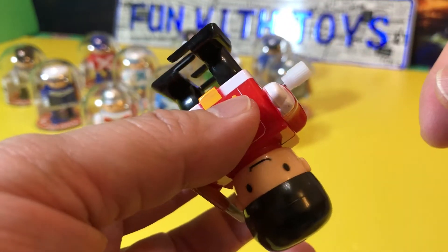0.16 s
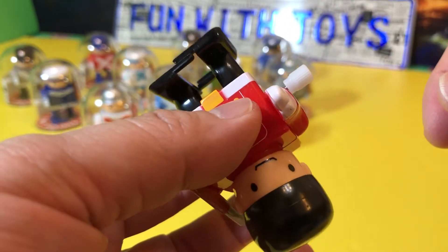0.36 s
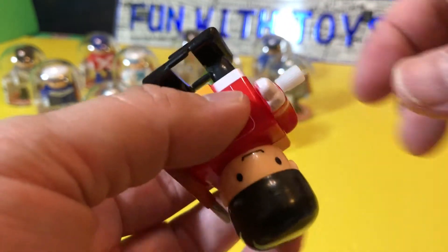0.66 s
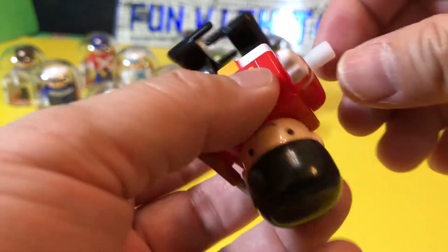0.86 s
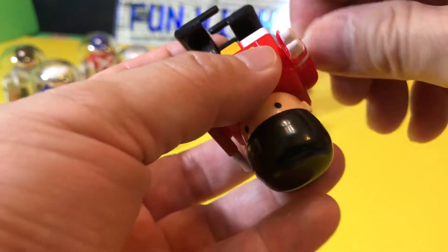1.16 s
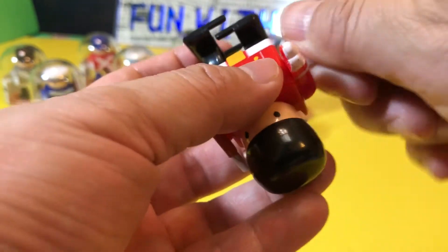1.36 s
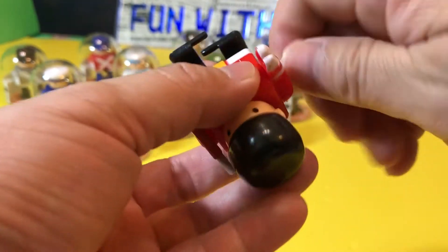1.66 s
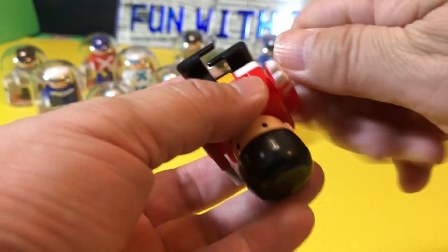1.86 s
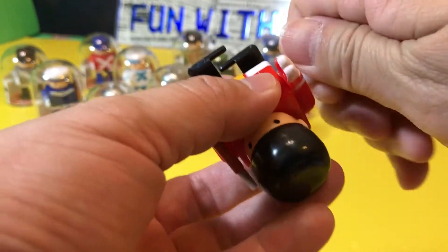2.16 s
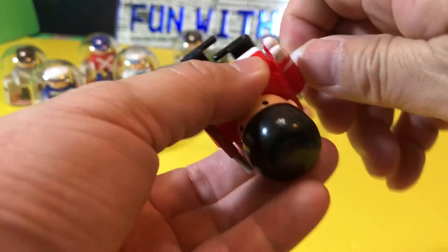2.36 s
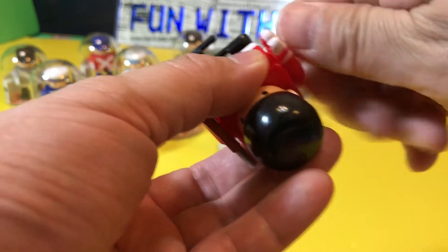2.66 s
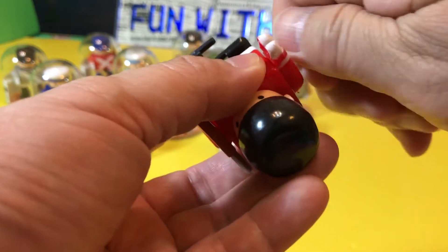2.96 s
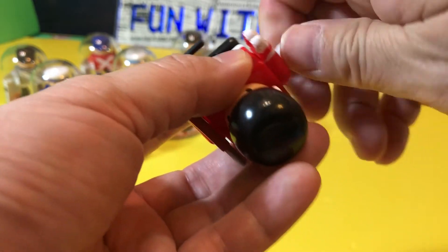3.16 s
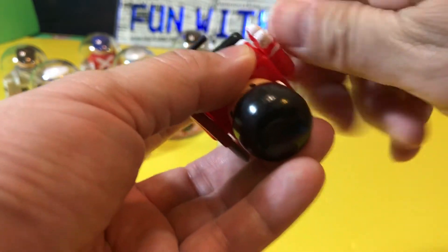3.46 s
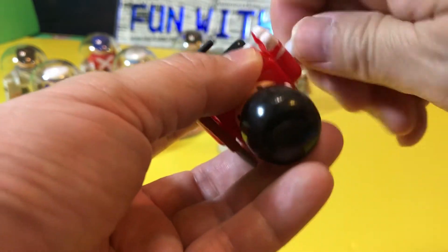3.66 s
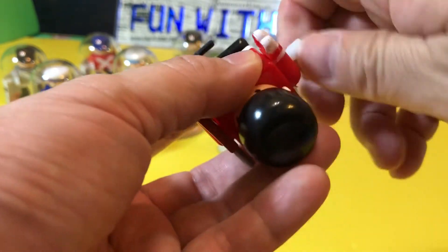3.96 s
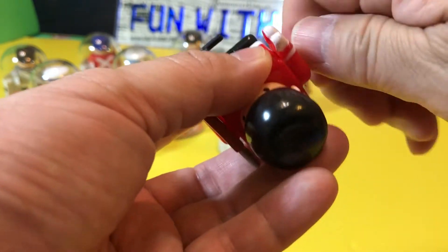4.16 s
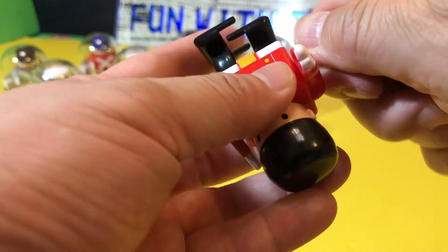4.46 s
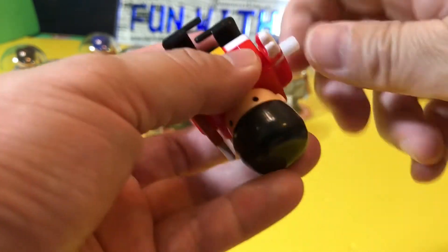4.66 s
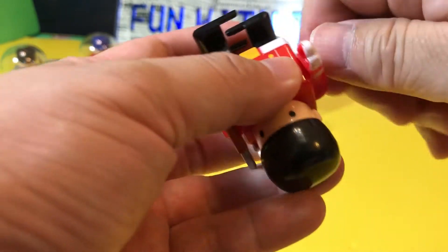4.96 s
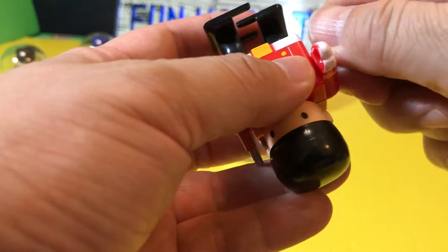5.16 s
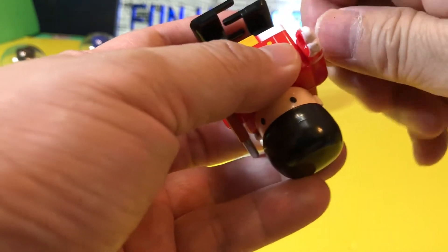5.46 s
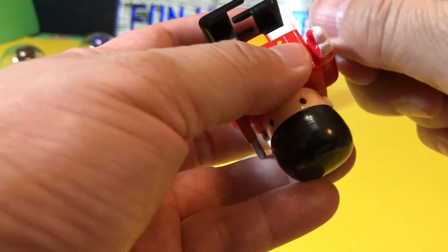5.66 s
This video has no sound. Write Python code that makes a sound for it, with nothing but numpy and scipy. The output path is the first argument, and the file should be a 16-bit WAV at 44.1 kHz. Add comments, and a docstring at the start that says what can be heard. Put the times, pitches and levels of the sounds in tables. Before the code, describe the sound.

Two brief buzzing whirs of tiny plastic gears come first, the second more uneven and growly. Then fingers wind the toy's knob: ten dry zipping ratchet bursts, quick at first, slower and more separate toward the end, with small clacks, short gear zips and faint finger rubs between. Close, detailed pickup, short room tail and low background hum.

```python
"""A quiet room: a small plastic clockwork toy is held close to the microphone.
Its motor whirs in two short runs: escapement beats and gear hiss through gliding resonances.
Then the knob is wound in ten twists: each ratchet click is a noise burst through the shell's modes.
Around the twists the gears slip briefly, the knob knocks with play and fingers rub the plastic.
Room noise, hum, fan tones and a faint thin tone lie beneath; the walls add a short tail."""
import sys
import numpy as np
from scipy import signal
from scipy.fft import rfft, irfft
from scipy.io import wavfile
from scipy.ndimage import uniform_filter1d

SR = 44100
rng = np.random.default_rng(int(sys.argv[2]) if len(sys.argv) > 2 else 0)


def wav_out(sig):
    """Save sig, one row per channel (or a flat mono array), as 16-bit PCM at SR to the path in sys.argv[1]."""
    wavfile.write(sys.argv[1], SR, np.round(np.clip(np.atleast_2d(sig).T, -1, 1) * 32767).astype(np.int16))


N = 255780
CLICK_SIZE = 1024  # samples


def gain_of(db):
    """Amplitude factor of a level in dB."""
    return 10 ** (np.asarray(db) / 20)


def evened(x):
    """Scale to unit RMS."""
    return x / np.sqrt(np.mean(x ** 2) + 1e-20)


def read(points, hz):
    """Interpolate (frequency, value) points over log frequency."""
    f, value = np.transpose(points)
    return np.interp(np.log(hz + 1), np.log(f + 1), value)


def add(mix, start_s, sound):
    """Add a sound into the mix in place."""
    part = mix[max(round(start_s * SR), 0):][:len(sound)]
    part += sound[:len(part)]


def bins(size):
    """Frequencies of the FFT bins, Hz."""
    return np.fft.rfftfreq(size, 1 / SR)


def causal(db):
    """The minimum-phase response that has this gain in dB."""
    log_gain = db * np.log(10) / 20
    circle = np.concatenate([log_gain, log_gain[-2:0:-1]])
    return np.exp(np.conj(signal.hilbert(circle)))[:len(db)]


def coloured(x, points):
    """Zero-phase filter to a spectrum given in dB."""
    return irfft(rfft(x) * gain_of(read(points, bins(len(x)))), len(x))


def ringing_db(rings, hz):
    """Summed lift of resonances, each a bell falling to half its dB at half its width off centre."""
    return sum(db / (1 + (2 * (hz - f) / width) ** 2) for f, width, db in rings)


def colour_db(x, size=25):
    """The broad bumps and dips in the spectrum of a blow."""
    power = uniform_filter1d(abs(rfft(x, 2 * CLICK_SIZE)) ** 2, size)
    return 10 * np.log10(power / power.mean())


def wobble(length, hz):
    """Slow random curve of unit RMS, with hz random knots a second."""
    along = np.arange(length) * hz / SR
    knots = int(along[-1]) + 2
    return evened(np.interp(along, np.arange(knots), rng.standard_normal(knots)))


def tones(lines, waver):
    """Steady tones whose phase wanders slowly in a random walk."""
    t = np.arange(N) / SR
    knots = np.linspace(0, t[-1], num=40)
    out = np.zeros(N)
    for hz, db in lines:
        phase = 2 * np.pi * (hz * t + rng.random())
        phase += waver * np.interp(t, knots, np.cumsum(rng.standard_normal(len(knots))))
        out += np.sqrt(2) * gain_of(db) * np.sin(phase)
    return out


def background(air_db=-58.7):
    """Coloured room noise, a mains hum that swells and sinks, and a wavering fan."""
    # room noise spectrum: (frequency [Hz], relative density [dB])
    air_colour = [(22, -28), (36, -4), (288, -2), (404, -9.5), (698, -15), (953, -15.5), (2310, -21),
                  (2630, -23), (5580, -32.5), (9500, -35), (15000, -39)]
    # mains hum before its swell: (frequency [Hz], level [dB])
    hum = [(99.8, -72), (150.3, -70.5)]
    # swell of the hum: (time [s], relative level [dB])
    hum_swell = [(0, -17), (.5, 2.5), (.75, 7.5), (2.1, 1.5), (5.8, -5)]
    # fan tones: (frequency [Hz], level [dB])
    fan = [(305, -68.5), (488, -79), (931, -80)]
    swell = gain_of(np.interp(np.arange(N) / SR, *np.transpose(hum_swell)))
    air = gain_of(air_db) * evened(coloured(rng.standard_normal(N), air_colour))
    return air + swell * tones(hum, waver=0.17) + tones(fan, waver=1.825)


def escapement(beats_per_s, beat_t60_s=0.0062, attack_s=0.00014, weak_db=-3, scatter_db=0.8,
               jitter_s=.00006, mesh_db=-6, alike=0.29):
    """A rocking anchor hits the wheel with strong and weak pallet in turn, over the hiss of meshing gears."""
    size, t = len(beats_per_s), np.arange(CLICK_SIZE // 2) / SR
    at = np.flatnonzero(np.diff(np.floor(np.cumsum(beats_per_s) / SR), prepend=-1))
    pallets = rng.standard_normal((2, len(t)))
    share, out = np.clip(alike, 0, 1), np.zeros(size)
    decay = np.minimum(t / attack_s, 1) * gain_of(-60 * t / beat_t60_s)
    chances = rng.standard_normal((len(at), 2))
    for k, (i, (force, late)) in enumerate(zip(at, chances)):
        blow = np.sqrt(share) * pallets[k % 2] + np.sqrt(1 - share) * rng.standard_normal(len(t))
        level_db = weak_db * (k % 2) + scatter_db * force
        add(out, i / SR + jitter_s * late, blow * decay * gain_of(level_db))
    hiss = evened(beats_per_s) * rng.standard_normal(size)  # louder when the gears run faster
    return evened(out) + gain_of(mesh_db) * hiss


def gearbox(x, rings, depth=1):
    """The motor's rattle passes through the ringing parts of the toy."""
    # gear train spectrum, floored at -60 dB: (frequency [Hz], relative gain [dB])
    gears = [(530, -48), (900, -24), (2080, -14.5), (2470, -7.5), (2860, -11.5), (3390, -8), (3740, -9),
             (7300, -6), (11200, -4), (13300, -5.5), (15200, -2), (15900, -13.5), (16500, -51.5)]
    hz = bins(2 * CLICK_SIZE)
    response = irfft(causal(np.maximum(read(gears, hz), -60) + depth * ringing_db(rings, hz)))
    return evened(signal.fftconvolve(x, response)[:len(x)])


def shifting_gearbox(x, rings, count=11, drift=0.0052, flutter_db=1.5):
    """As the legs swing and the hand shifts its hold, the resonances glide, wander and swell or fade."""
    along, out = np.linspace(0, 1, len(x)), np.zeros(len(x))
    for stage in np.linspace(0, 1, count):
        now = []
        for ring, (shift, favour) in zip(rings, rng.standard_normal((len(rings), 2))):
            hz, glide_hz, width_hz, db, swell_db = ring
            now_hz = (hz + glide_hz * stage) * (1 + drift * shift)
            now.append((now_hz, width_hz, db + swell_db * stage + flutter_db * favour))
        crossfade = np.maximum(1 - abs(along - stage) * (count - 1), 0)
        out += gearbox(x, now) * crossfade
    return evened(out)


def free_runs(growl_db=-3, growl_hz=3400, rough_hz=180, rough_db=1.5):
    """The spring drives the legs in the air; the gears run unevenly, with a rough growl below growl_hz."""
    # two runs of the motor, growl before growl_db:
    # (time [s], level [dB], relative growl [dB], escapement rate [beats/s])
    runs = [
        [(0, -27, -22, 596), (.125, -34.5, -24.5, 467), (.2, -32, -25, 440), (.234, -27.5, -23.5, 600),
         (.402, -29.5, -20, 500), (.43, -39.5, -18, 430), (.47, -43.5, -19, 490), (.49, -68, -18, 500)],
        [(.748, -43.5, -26, 200), (.783, -33.5, -20.5, 390), (.852, -37.5, -29, 280), (.925, -30, -17, 470),
         (1.04, -33, -13.5, 580), (1.081, -30, -17.5, 560), (1.1, -52, -34, 640)],
    ]
    # gear train resonances of each run, before drift and flutter:
    # (frequency [Hz], glide over the run [Hz], width [Hz], lift [dB], swell over the run [dB])
    gear_rings = [
        [(1350, 0, 300, 2, 12), (3370, 0, 300, 7, -8), (4340, 150, 390, 4.5, 2), (6300, -2, 660, 5.5, 0),
         (7470, -100, 360, 11.5, -5.5), (8920, 1200, 510, 7.5, -2.5), (11500, -250, 600, 5.5, -1),
         (13000, -1, 700, -10, 7.5), (14850, 251.5, 770, 3, 4)],
        [(2450, -3, 540, 1.5, 5), (3190, 2, 320, 4, 2.5), (5600, 298, 480, 8.5, -11), (7100, 250, 550, 6, -0.5),
         (9220, 200, 480, 7, -5), (11100, 96, 400, 3, 5), (15100, 350, 600, 4.5, -4.5)],
    ]
    lowpass = signal.butter(4, growl_hz, fs=SR, output="sos")
    out = np.zeros(N)
    for rows, rings in zip(runs, gear_rings):
        s, level_db, growls_db, beats_per_s = np.transpose(rows)
        t = np.arange(s[0], s[-1], 1 / SR)
        whir = shifting_gearbox(escapement(np.interp(t, s, beats_per_s)), rings)
        low = signal.sosfiltfilt(lowpass, whir)
        growl = evened(low * gain_of(rough_db * wobble(len(t), rough_hz)))
        whir = whir - low + growl * gain_of(np.interp(t, s, growls_db) + growl_db)
        add(out, s[0], whir * gain_of(np.interp(t, s, level_db)))
    return out


def room(x, wet_db=-23, delay_s=.012):
    """A faint diffuse tail, each band dying at its own speed, and scattered echoes from near walls."""
    # decay of the tail: (frequency [Hz], T60 [s])
    tail_t60 = [(500, 0.39), (2500, 0.357), (6000, 0.35), (11000, 0.3), (16000, 0.21)]
    # what the walls give back: (frequency [Hz], relative level [dB])
    walls = [(1000, 1.5), (5000, 0.5), (11000, -3), (15000, -5)]
    # near walls: (delay [s], level [dB])
    echoes = [(0.0154, -26.5), (.033, -32)]
    hz, t, z = signal.stft(rng.standard_normal(SR // 2), SR, nperseg=256)
    fading_db = read(walls, hz)[:, None] - 60 * t / read(tail_t60, hz)[:, None]
    tail = signal.istft(z * gain_of(fading_db), SR, nperseg=256)[1]
    response = np.zeros(SR // 2)
    add(response, delay_s, gain_of(wet_db) * tail / np.linalg.norm(tail))
    size = CLICK_SIZE // 8
    for echo_s, echo_db in echoes:
        echo = rng.standard_normal(size) * signal.windows.hann(size)
        add(response, echo_s, gain_of(echo_db) * echo / np.linalg.norm(echo))
    return signal.fftconvolve(x, response)[:N]


def whistle(start_s=0.42, length_s=0.47, hz=1938, db=-74):
    """A faint thin tone, faded in and out around the pause between the two runs."""
    out, size = np.zeros(N), int(length_s * SR)
    add(out, start_s, tones([(hz, db)], waver=0.88)[:size] * signal.windows.tukey(size, .5))
    return out


def slips(onset_db=-9, rise_share=0.19, braking=1.8, ring_hz=9150, ring_width_hz=900, ring_db=10.5,
          usual_beats_per_s=400, usual_db=-29, db_per_doubling=20):
    """As the grip on the knob loosens, the motor spins up for a moment and is braked again."""
    # slips around the twists: (start [s], length [s], level [dB], fall by the end [dB])
    slip_rows = [(1.187, 0.073, -33, -1), (1.514, 0.036, -52, 11), (2.317, 0.032, -29, 25),
                 (2.422, 0.023, -43.5, 8.5), (2.925, 0.025, -49, -6), (3.122, 0.068, -30.5, 26.5),
                 (3.297, 0.036, -47.5, -3.5), (3.501, 0.05, -27.5, 19), (3.623, 0.023, -39.5, 10),
                 (3.729, 0.024, -42, -2), (3.928, 0.088, -29.5, 17.5), (4.144, 0.064, -38, 0),
                 (4.42, 0.082, -46.5, 6), (4.627, 0.025, -37, 21)]
    # gear train resonances while the knob is held: (frequency [Hz], width [Hz], lift [dB])
    held_rings = [(1932, 320, -8), (4800, 400, 4.5), (6400, 480, 4.5), (11400, 1200, 3.5), (14600, 680, 2)]
    out = np.zeros(N)
    for start_s, length_s, db, fall_db in slip_rows:
        along = np.linspace(0, 1, int(length_s * SR))
        rise = np.interp(along, [0, rise_share], [1, 0])
        fall = np.interp(along, [rise_share, 1], [0, 1])
        level_db = db + onset_db * rise - fall_db * fall ** braking
        # a louder slip is a faster one
        beats_per_s = usual_beats_per_s * 2 ** ((db - usual_db) / db_per_doubling)
        rattle = escapement(np.full(len(along), beats_per_s), scatter_db=0.0, mesh_db=-4)
        slip = gearbox(rattle, held_rings + [(ring_hz, ring_width_hz, ring_db)])
        add(out, start_s, slip * gain_of(level_db))
    return out


def ratchet(clicks, alike, depth, softness=0.33, soft_hz=2850, hard_knock_db=-10, attack_s=0.0003,
            hold_s=0.00071, snap_t60_s=0.0088, top_speed=1.9, ring_t60_s=0.039, ring_db=-23,
            scrape_s=0.00022, scrape_db=-15, knock_lag_s=0.00018, lead_s=.0016, trim_db=-0.71,
            drift=0.02, spot_db=2.5, evenness=.35):
    """The pawl scrapes off a tooth, drops and shakes the hand-damped shell; clicks of one grip are alike."""
    # plastic shell under a click: (frequency [Hz], relative gain [dB])
    shell_colour = [(200, -37), (650, -30), (900, -27), (1350, -17.5), (1900, -18), (2400, -15.5),
                    (3100, -12), (4300, -12.5), (6300, -1), (8000, -3), (9300, 2), (13000, 1), (14700, 3),
                    (15500, 2.5), (16200, -7.5), (17000, -27)]
    # fixed dip in the shell's response, before depth: (frequency [Hz], width [Hz], lift [dB])
    dips = [(5700, 410, -4)]
    # each new grip presses the shell elsewhere; before drift, spot, hardness and depth:
    # (from [s], low, middle, high, upper, top mode [Hz], top, pawl, hollow lift [dB])
    grips = [(1.1, 4370, 6500, 9250, 11450, 14600, 7.5, 6.5, 1),
             (1.7, 4400, 6350, 8920, 11300, 15000, 4, 9, -1.5),
             (2.1, 4340, 6500, 9030, 11550, 15100, 3.5, 2.5, -1.5),
             (2.5, 4500, 6950, 9050, 11460, 14670, 7, 1.5, -3),
             (2.9, 4700, 6450, 9070, 11300, 14350, 9, 4.5, -4.5),
             (3.28, 4700, 6900, 8940, 11300, 14650, 13, 7, -2.5),
             (3.7, 4700, 6300, 9060, 11400, 14700, 8, 6.5, -1.5),
             (4.1, 5100, 6150, 9140, 11600, 14900, 7, 1.5, 0),
             (4.9, 4400, 6350, 10000, 11540, 15000, 2, 2, -6),
             (5.5, 4920, 7620, 10400, 11800, 15000, 3.5, 8, -4.5)]
    # low to upper modes, before spot, hardness and depth: (width [Hz], lift [dB])
    grip_modes = [(600, 4.5), (600, 3.5), (600, 7.5), (830, 5.5)]
    # knock | snap | sizzle crossovers: (lower [Hz], upper [Hz])
    band_edges = (4800, 12700)
    top_width_hz, pawl_hz, pawl_width_hz = 980, 2427, 310
    hollow_hz, hollow_width_hz = 1750, 990
    body_hz, body_width_hz, body_per_knock, usual_knock_db = 5900, 2800, .65, -14

    t, hz = np.arange(CLICK_SIZE) / SR - lead_s, bins(2 * CLICK_SIZE)
    # knock, snap and sizzle: the low motions are fed for a moment, the top dies at once
    free_s = np.maximum([t - 2 * hold_s, t - hold_s, t * top_speed], 0)
    attack = np.clip(t / attack_s + .5, 0, 1)
    decay = attack * np.hypot(gain_of(-60 * free_s / snap_t60_s),
                              gain_of(ring_db - 60 * free_s / ring_t60_s))
    decay += gain_of(scrape_db) * np.exp(-abs(t) / scrape_s)
    low, under_top = (1 / (1 + (hz / edge) ** 16) for edge in band_edges)
    lag = np.exp(-2j * np.pi * np.cumsum(low) * hz[1] * knock_lag_s)  # the knock comes a little later
    bands = lag * np.array([low, under_top - low, 1 - under_top])
    grip_noise = rng.standard_normal((len(grips), CLICK_SIZE))
    share, out = np.clip(alike, 0, 1), np.zeros(N)
    for s, db, knock_db, sizzle_db in clicks:
        k = np.searchsorted([row[0] for row in grips], s) - 1
        _, *grip_hz, top_db, pawl_db, hollow_db = grips[k]
        # each click lands on a slightly different spot: the modes shift and some speak more than others
        spot = rng.standard_normal((len(grip_hz), 2))
        hardness = np.clip(-knock_db / 10, 0, 1)  # a dull touch does not wake the modes
        shapes = [*grip_modes, (top_width_hz, top_db)]
        modes = []
        for f, (width_hz, lift_db), (shift, favour) in zip(grip_hz, shapes, spot):
            modes.append((f * (1 + drift * shift), width_hz, hardness * (lift_db + spot_db * favour)))
        # among hard clicks, a heavier knock fills the middle of the shell's range, a light one thins it
        body_db = hardness * body_per_knock * (knock_db - usual_knock_db)
        modes += [*dips, (pawl_hz, pawl_width_hz, pawl_db), (hollow_hz, hollow_width_hz, hollow_db),
                  (body_hz, body_width_hz, body_db)]
        # a blow that is mostly knock is a soft one: it loses level away from soft_hz
        octaves_off = np.minimum(abs(np.log2((hz + 1) / soft_hz)), 1)
        soft_db = softness * max(knock_db - hard_knock_db, 0) * octaves_off
        shell_db = read(shell_colour, hz) + depth * ringing_db(modes, hz) - soft_db
        fresh = rng.standard_normal(CLICK_SIZE)
        blow = (np.sqrt(share) * grip_noise[k] + np.sqrt(1 - share) * fresh) * decay
        # the knock varies less in colour from blow to blow than the snap does
        shell = causal(shell_db - np.clip(evenness, 0, 1) * low * colour_db(blow[0]))
        parts = irfft(rfft(blow, 2 * CLICK_SIZE) * shell * bands)
        parts /= np.sqrt((parts ** 2).sum(1, keepdims=True) / (.004 * SR))  # level refers to 4 ms
        levels_db = db + trim_db + np.array([knock_db, 0, sizzle_db])
        add(out, s - lead_s, (gain_of(levels_db) @ parts)[:CLICK_SIZE])
    return out


def fingers(catches_per_s=1100, slide_db=-3):
    """Skin catches and slides on the plastic: random impulses over steady noise."""
    # fingertip rubs: (start [s], length [s], level [dB])
    rubs = [(2.437, 0.077, -61), (4.664, 0.026, -51), (4.853, 0.067, -59.5), (5.323, 0.04, -54)]
    # rubbing spectrum: (frequency [Hz], relative gain [dB])
    skin = [(600, -22.5), (1500, 0), (2500, 6), (3500, -2), (6000, -7.5), (10000, -18), (16000, -33)]
    out = np.zeros(N)
    for start_s, length_s, db in rubs:
        size = int(length_s * SR)
        catches = rng.standard_normal(size) * (rng.random(size) < catches_per_s / SR)
        slide = gain_of(slide_db) * rng.standard_normal(size)
        rub = evened(coloured(evened(catches) + slide, skin))
        add(out, start_s, gain_of(db) * rub * signal.windows.tukey(size, .5))
    return out


def scene():
    """The microphone faces one side of the toy; the room blends clicks of all sides into one casing colour."""
    # pawl drops over one tooth as the knob is pushed round, before ratchet trim:
    # (time [s], level [dB], relative low knock [dB], relative top sizzle [dB])
    teeth = [(1.2386, -19.0, -16, -7), (1.2498, -22.0, -16, -3), (1.2621, -23.0, -15, -3),
             (1.2713, -21.5, -15, -1), (1.2784, -21.0, -14, -2), (1.2862, -22.5, -19, -3),
             (1.2968, -24.0, -13, -1), (1.3118, -21.5, -10, -5), (1.3299, -22.0, -17, 3),
             (1.3487, -19.0, -19, -3), (1.3604, -20.0, -15, 1), (1.3689, -17.0, -23, -2),
             (1.3756, -21.5, -16, -4), (1.3817, -25.0, -15, -3), (1.3889, -25.5, -10, -5),
             (1.3985, -25.5, -12, -3), (1.4121, -24.0, -12, -5), (1.4321, -23.5, -11, -8),
             (1.7432, -21.0, -13, -8), (1.7514, -20.5, -17, -6), (1.7587, -21.0, -17, -6),
             (1.7663, -23.0, -16, -3), (1.7755, -24.5, -13, -3), (1.7858, -25.5, -15, -5),
             (1.8012, -21.5, -19, -2), (1.8138, -24.5, -11, -7), (1.8243, -25.5, -10, -8),
             (1.8324, -26.0, -9, 1), (1.8393, -20.5, -20, -1), (1.8471, -24.0, -17, -3),
             (1.8564, -24.0, -14, -1), (1.8678, -23.5, -11, -7), (2.1754, -17.0, -19, -5),
             (2.1834, -20.0, -12, -6), (2.1888, -21.5, -16, -2), (2.1933, -18.5, -16, -6),
             (2.1978, -18.0, -15, -5), (2.2025, -17.0, -18, -8), (2.2074, -19.5, -19, -9),
             (2.2125, -21.0, -13, -5), (2.2184, -23.5, -10, -2), (2.2265, -22.0, -15, -4),
             (2.2473, -21.5, -16, -5), (2.532, -20.0, -15, -7), (2.5433, -19.5, -19, 6),
             (2.5534, -17.5, -19, 1), (2.5619, -15.5, -28, -3), (2.5712, -17.5, -18, -10),
             (2.5795, -17.5, -17, -15), (2.5894, -20.5, -16, -5), (2.5981, -20.5, -17, 4),
             (2.6048, -22.0, -17, 6), (2.6127, -22.5, -14, 3), (2.622, -18.5, -14, 3),
             (2.6332, -17.5, -15, -1), (2.6544, -19.5, -14, 1), (2.9444, -20.0, -17, -5),
             (2.9535, -19.0, -19, -5), (2.9601, -18.0, -16, -5), (2.9657, -19.5, -18, -6),
             (2.9713, -22.5, -15, -3), (2.978, -22.5, -15, 3), (2.9889, -23.0, -9, 7),
             (3.0031, -17.0, -18, -2), (3.0258, -21.5, -16, 1), (3.0487, -23.5, -7, -4),
             (3.0698, -24.0, -10, -1), (3.327, -21.0, -21, 7), (3.3344, -23.0, -22, 8),
             (3.3414, -20.5, -17, -6), (3.3488, -17.5, -18, -9), (3.3578, -19.5, -15, -1),
             (3.369, -20.5, -13, 1), (3.3842, -22.0, -11, -5), (3.404, -22.5, -6, -6),
             (3.4188, -21.5, -13, -1), (3.432, -23.0, -14, 3), (3.4485, -20.5, -17, -3),
             (3.7528, -22.5, -15, 5), (3.7606, -24.5, -16, 8), (3.7672, -24.0, -13, 6),
             (3.7732, -26.5, -11, 3), (3.7802, -23.5, -15, 2), (3.7882, -26.0, -10, 5),
             (3.7985, -22.0, -16, 0), (3.8142, -22.0, -14, -5), (3.8407, -24.5, -8, -2),
             (3.8588, -22.5, -10, 3), (3.875, -19.0, -12, 3), (4.1802, -23.5, -12, 1),
             (4.1957, -22.5, -13, -2), (4.2158, -21.5, -10, -2), (4.2359, -21.0, -13, -4),
             (4.2596, -21.0, -16, -2), (4.281, -23.5, -9, -1), (4.2979, -21.5, -11, -4),
             (4.3165, -21.5, -13, -5), (4.339, -22.5, -13, 1), (4.3769, -25.0, -15, 0),
             (4.4086, -21.5, -15, -2), (4.4334, -22.0, -18, -4), (4.4773, -27.0, -10, 0),
             (4.5165, -22.0, -9, -4), (4.9958, -20.5, -15, -9), (5.0156, -25.0, -13, 0),
             (5.0323, -22.0, -15, -2), (5.0527, -21.0, -15, -7), (5.072, -20.0, -11, -6),
             (5.0958, -22.0, -7, -2), (5.1227, -18.0, -16, -6), (5.1486, -18.0, -15, -5),
             (5.1676, -17.0, -13, -7), (5.1836, -18.5, -12, -5), (5.2074, -17.5, -17, -6),
             (5.5984, -21.0, -20, -7), (5.6191, -25.5, -14, -1), (5.6418, -27.0, -7, 5),
             (5.6761, -21.0, -17, 0), (5.7076, -21.0, -20, 3), (5.739, -21.0, -12, 2)]
    # play in the knob as it is let go or touched, before ratchet trim:
    # (time [s], level [dB], relative low knock [dB], relative top sizzle [dB])
    knocks = [(1.5039, -19.5, -7.5, -14), (1.7218, -45, -7, -13), (1.7325, -44, -1, -20),
              (1.9179, -31.5, -9.5, -16), (1.9672, -56.5, 11.5, -2.5), (2.1555, -43.5, -8.5, -23.5),
              (2.3152, -18, -11, -21.5), (2.5126, -44.5, 3.5, -25), (2.523, -39.5, -20, -12.5),
              (2.711, -31.5, -8, -21.5), (3.1245, -33, -4, -15), (3.2512, -46.5, -7.5, -3),
              (3.5018, -15, -11.5, -12), (4.4253, -32.5, -8, -13.5), (4.6093, -37, -1.5, -17.5),
              (4.6313, -23.5, -8.5, -23), (4.6799, -52.5, 7.5, -5.5), (4.864, -63.5, 11, -12.5),
              (5.2989, -41.5, -10, -15.5), (5.3382, -57, 17.5, -9), (5.3605, -62, 19, -18)]
    # what the casing radiates to all sides: (frequency [Hz], width [Hz], lift [dB])
    casing_rings = [(4400, 790, 4), (5540, 700, -0.5), (14600, 1500, 3)]
    motor_and_hands = free_runs() + slips() + fingers()
    clicks = list(teeth) + list(knocks)
    facing = ratchet(clicks, alike=0.28, depth=0.97)
    all_sides = ratchet(clicks, alike=0, depth=.2)
    casing = irfft(causal(ringing_db(casing_rings, bins(CLICK_SIZE))))
    all_sides = signal.fftconvolve(all_sides, casing)[:N]
    direct = facing + motor_and_hands
    return (direct + room(all_sides + motor_and_hands) + background() + whistle())[None]


def record(dry):
    """Band limit: a linear-phase low-pass that removes the highest treble."""
    lowpass = signal.firwin(511, 16900, window=("kaiser", 9), fs=SR)  # cutoff in Hz
    return signal.oaconvolve(dry, lowpass[None], "same")


dry = scene()
out = record(dry)
wav_out(out)
```